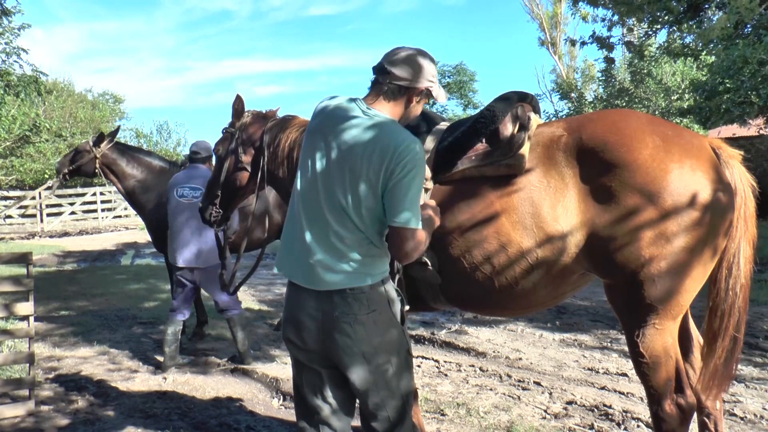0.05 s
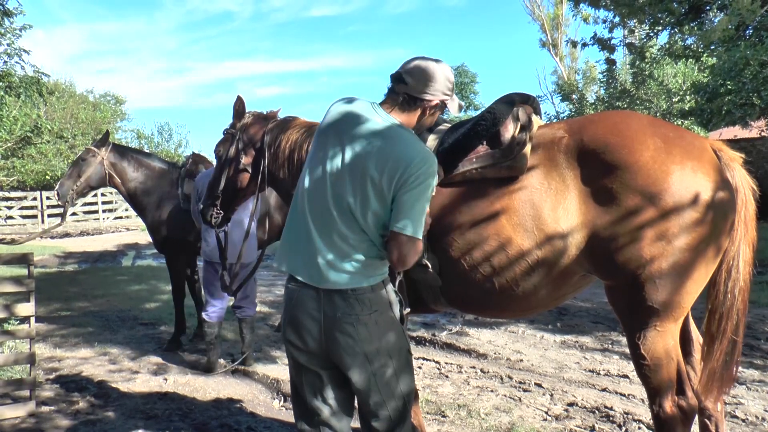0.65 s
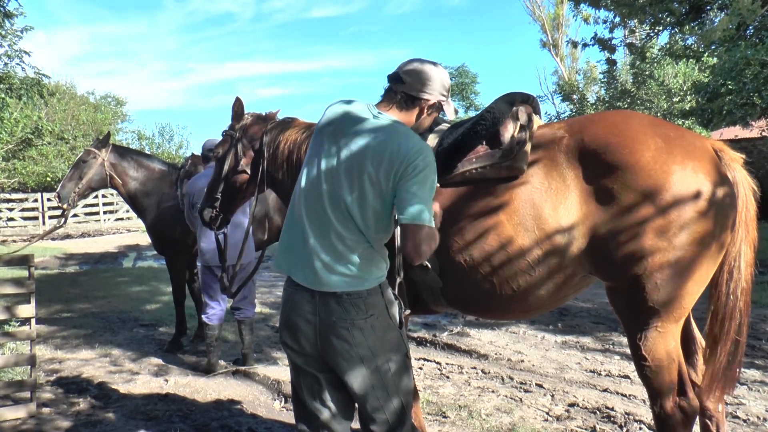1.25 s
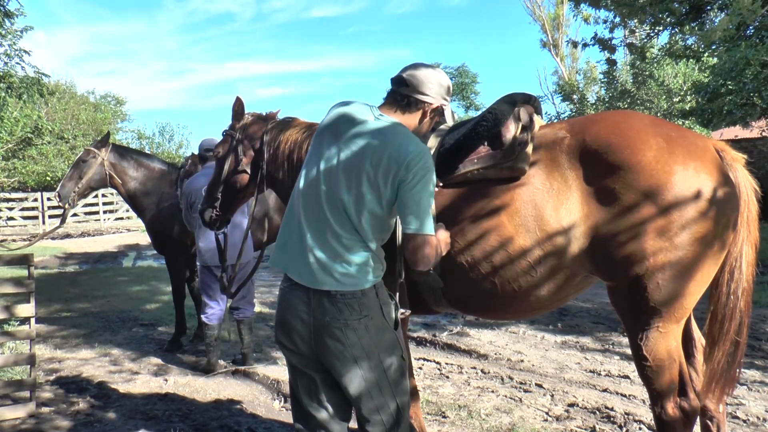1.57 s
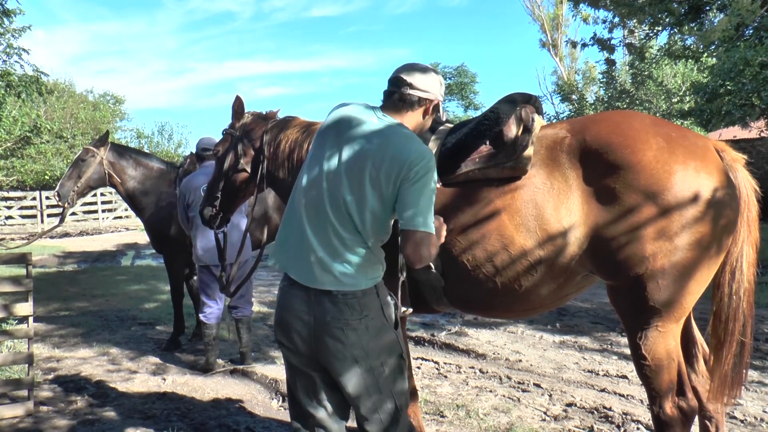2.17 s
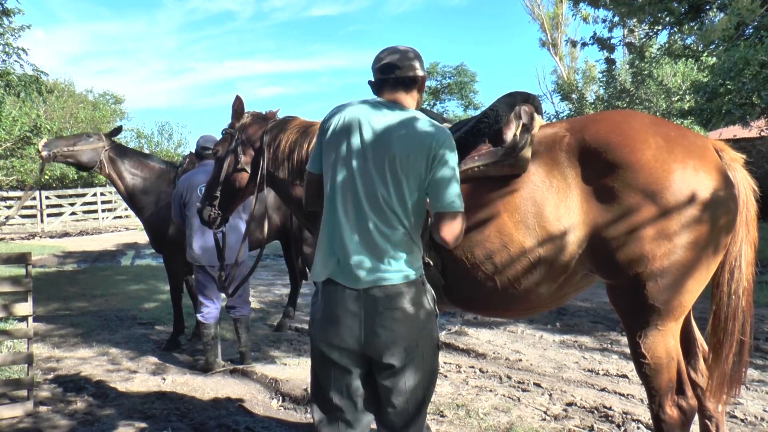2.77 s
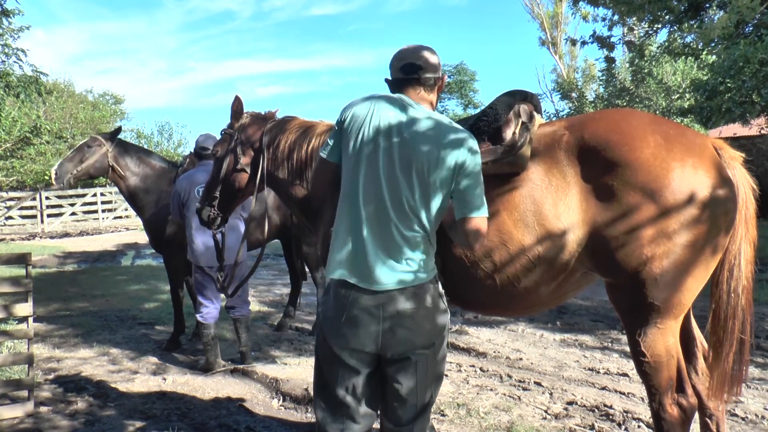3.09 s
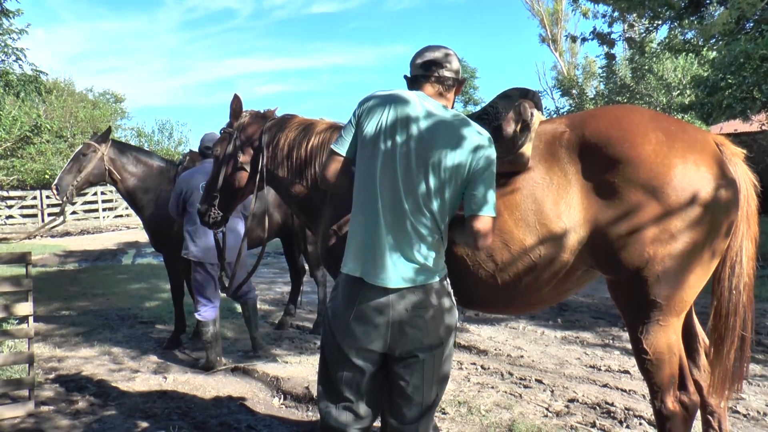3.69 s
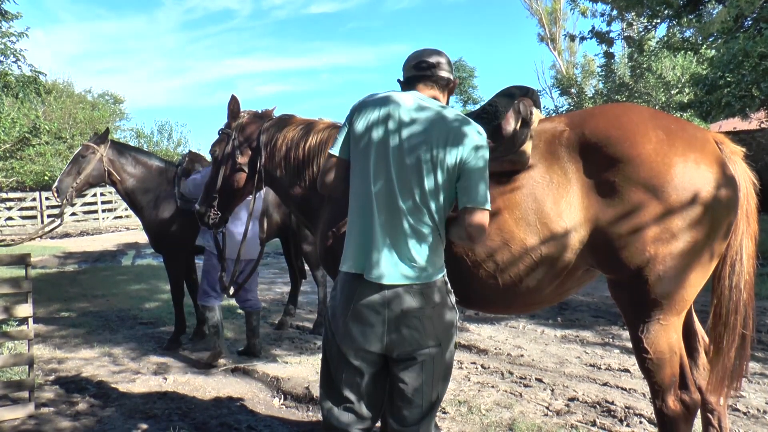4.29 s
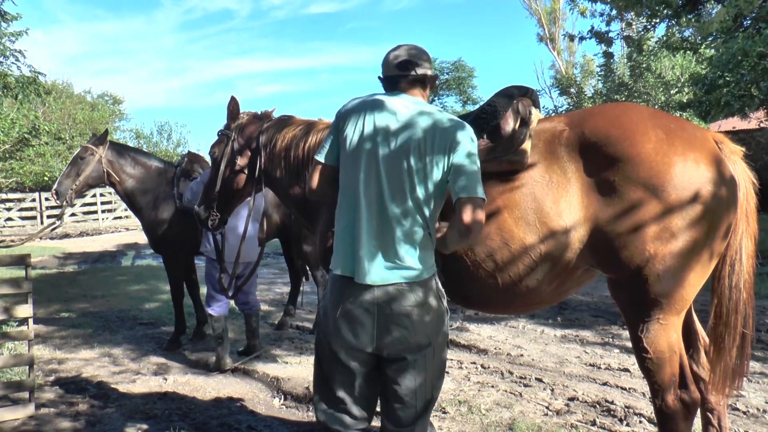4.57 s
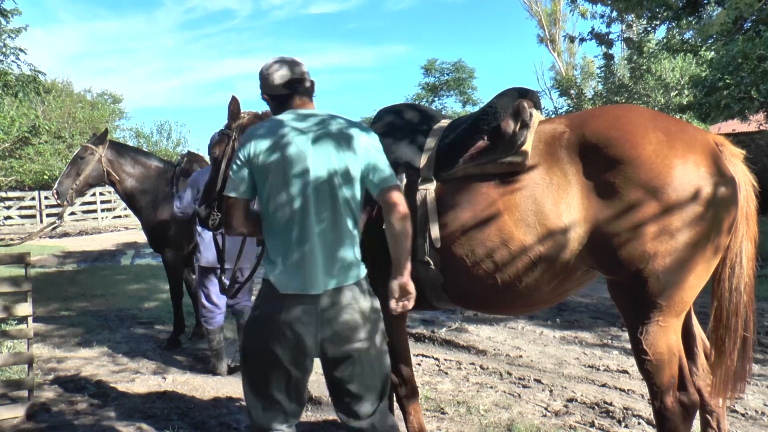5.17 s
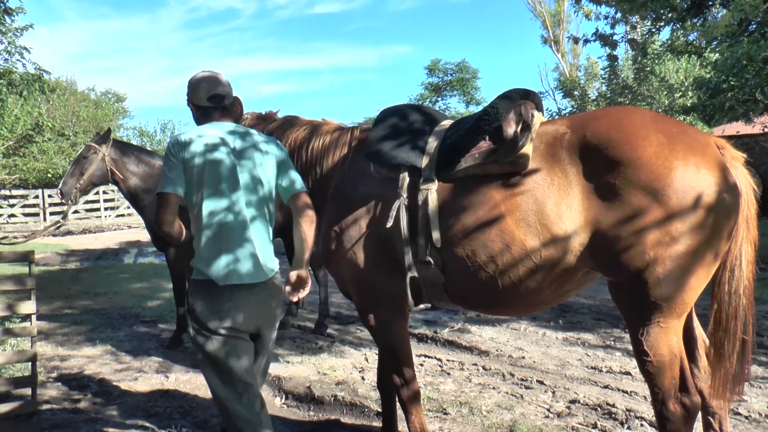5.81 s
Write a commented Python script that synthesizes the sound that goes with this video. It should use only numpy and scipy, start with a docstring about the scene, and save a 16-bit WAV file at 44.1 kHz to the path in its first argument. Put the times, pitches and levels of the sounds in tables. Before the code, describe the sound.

In an open corral, a songbird repeats a quick whistled phrase over high, pulsing crickets. Another bird trills, then gives falling buzzy calls. Saddle leather and buckles tick briefly, and boots and hooves softly scuff dry earth. The first bird returns as a throbbing insect swells, and rapid high chips close the scene. A light breeze rumbles on the microphone.

```python
"""Saddling up in a sunny corral.

Songbirds whistle and buzz over the wing strokes of crickets and a katydid; a throbbing insect joins late.
A man tightens a saddle (leather creaks, buckles tick); boots and hooves scuff dry, gritty ground.
A light breeze rocks the microphone; trees and fences return a faint echo."""
import sys
import numpy as np
from scipy import signal
from scipy.fft import rfft, irfft, next_fast_len
from scipy.io import wavfile
from scipy.ndimage import uniform_filter1d

SR = 44100
rng = np.random.default_rng(int(sys.argv[2]) if len(sys.argv) > 2 else 0)


def put_to_file(sound):
    """Save the sound as 16-bit audio at rate SR, in the file named by the first command-line argument."""
    columns = np.atleast_2d(sound).T  # one column per channel
    safe = np.clip(columns, -1, 1)
    whole_steps = np.round(safe * 32767)
    wavfile.write(sys.argv[1], SR, whole_steps.astype(np.int16))


N = 257544
TIME = np.arange(N) / SR


def amp(db):
    """Decibels to gain."""
    return 10 ** (np.asarray(db) / 20)


def unit(x):
    """Scale to rms 1."""
    return x / np.sqrt(np.mean(x ** 2) + 1e-20)


def tone(hz):
    """Sine along a pitch track."""
    return np.sin(2 * np.pi * np.cumsum(hz) / SR)


def curve(rows, t=TIME, column=1):
    """Table column, linearly interpolated in time."""
    rows = np.asarray(rows)
    return np.interp(t, rows[:, 0], rows[:, column])


def add(mix, at_s, sound):
    """Mix a sound in, dropping any overhang."""
    start = round(at_s * SR)
    sound = sound[max(-start, 0):]
    part = mix[max(start, 0):][:len(sound)]
    part += sound[:len(part)]


def noise(spectrum):
    """Shaped noise, rms 1."""
    hz, db = np.transpose(spectrum)
    size = next_fast_len(N)
    bins_hz = np.fft.rfftfreq(size, 1 / SR)
    gain = amp(np.interp(np.log(bins_hz + 1), np.log(hz + 1), db))
    return unit(irfft(rfft(rng.standard_normal(size)) * gain, size)[:N])


def wander(t, max_hz):
    """Smooth random drift, rms about 1."""
    rates_hz = max_hz * rng.uniform(.2, 1, 8)
    return np.sin(2 * np.pi * (np.outer(t, rates_hz) + rng.random(8))).sum(1) / 2


# Spectra of open air, far insects and birds, rumble, breeze (frequency [Hz], relative density [dB])
AIR_SPECTRUM = [(24, -40), (40, 2), (80, -1.5), (197, -6.5), (260, -8.5), (653, -12.5), (2330, -27),
                (2770, -32.5), (4460, -48.5), (5300, -28), (5860, -61.5), (7520, -33), (12700, -56),
                (14000, -36), (15500, -86)]
DRONE_SPECTRUM = [(1900, -18), (2400, 3.5), (2800, -4), (3500, 0.5), (4500, -3.5), (5300, 5), (6100, -4.5),
                  (7400, 4.5), (8600, -12.5), (12500, -21.5), (14300, -8), (15600, -4)]
RUMBLE_SPECTRUM = [(15, 9), (35, 2.5), (55, -1), (77, 2.5), (100, -13), (200, -34.5)]
BREEZE_SPECTRUM = [(1, 0.5), (4, 1), (9, -9), (13, -10.5), (18, -15.5), (25, -26), (35, -35), (50, -35),
                   (100, -61), (300, -100)]
# Air envelope (time [s], relative level [dB])
AIR_LEVELS = [(0.0, -46), (0.24, -49), (1.95, -48), (2.36, -50), (5.27, -52), (5.84, -51)]
# Breeze envelope (time [s], level [dB])
BREEZE_LEVELS = [(0, -23), (.5, -18), (1, -18), (1.6, -16), (2.35, -16), (2.6, -26.5), (3.8, -23),
                 (4.5, -30), (5.84, -28)]


def background(air_gain_db=3.2, drone_db=-54, rumble_db=-46):
    """Open air, a far drone of insects and birds, low rumble, breeze on the microphone."""
    air = noise(AIR_SPECTRUM) * amp(curve(AIR_LEVELS) + air_gain_db + .65 * wander(TIME, 14))
    drone = noise(DRONE_SPECTRUM) * amp(drone_db + 1.45 * wander(TIME, 25))
    rumble = noise(RUMBLE_SPECTRUM) * amp(rumble_db)
    breeze = noise(BREEZE_SPECTRUM) * amp(curve(BREEZE_LEVELS))
    return air + drone + rumble + breeze


def stridulate(runs, hz, rate_hz, stroke_s, sag, jitter=.037, late_chance=0, spread_db=1, rasp=.003):
    """Wing strokes: short tones that sag in pitch as the scraper slows."""
    out = np.zeros(N)
    t = np.arange(int(stroke_s * SR)) / SR
    window = np.sqrt(2) * signal.windows.tukey(len(t), .6)
    for start_s, end_s, db in runs:
        timing, force, detune, _ = rng.standard_normal((600, 4)).T
        late = rng.random(600) < late_chance
        gaps_s = (1 + jitter * timing + .5 * late) / rate_hz
        teeth = 4 * uniform_filter1d(rng.standard_normal((600, 1024)), 16, axis=1)[:, :len(t)]
        for k, at_s in enumerate(start_s + np.cumsum(gaps_s) - gaps_s[0]):
            if at_s > end_s - stroke_s / 2:
                break
            pitch_hz = hz * (1 + .0041 * detune[k] + sag * (.5 - t / stroke_s) + rasp * teeth[k])
            add(out, at_s, amp(db + spread_db * force[k]) * window * tone(pitch_hz))
    return out


# Stroke runs, one table per cricket (start [s], end [s], relative level [dB])
NEAR_RUNS = [(0, 2.635, 0), (2.752, 3.32, -1), (3.45, 4.61, 0), (4.62, 5.16, -2), (5.17, 5.685, 0),
             (5.78, 5.9, 0)]
RIVAL_RUNS = [(.37, .46, -2), (.5, .6, -3), (.73, .97, 0), (1.45, 1.55, -4), (1.88, 1.98, -2),
              (4.76, 5.0, -.5), (5.27, 5.4, -1)]
SLOW_RUNS = [(.612, .705, 0), (1.66, 1.81, 1), (2.1, 2.3, -6), (2.7, 2.87, -2), (3.86, 4.05, -2)]
THIN_RUNS = [(.3, 1.06, 0), (1.33, 1.56, 0), (1.88, 2.15, -2), (4.4, 5.1, -1), (5.35, 5.75, -1)]
# Faint, low cricket's run (start [s], end [s], level [dB])
LOW_RUNS = [(2.72, 3.3, -66)]


def crickets(near_db=-45.3, slow_db=-54, thin_db=-64):
    """Five crickets scrape their wings: two near at one pitch, one slower and higher, two far."""
    near = stridulate(NEAR_RUNS, hz=5285, rate_hz=79, stroke_s=.009, sag=.06,
                      jitter=.07, late_chance=.12)
    rival = stridulate(RIVAL_RUNS, hz=5270, rate_hz=76, stroke_s=.01, sag=.05, jitter=.15)
    slow = stridulate(SLOW_RUNS, hz=7820, rate_hz=43, stroke_s=.01335, sag=.12, rasp=.0052)
    thin = stridulate(THIN_RUNS, hz=10700, rate_hz=60, stroke_s=.006, sag=.071)
    low = stridulate(LOW_RUNS, hz=2820, rate_hz=120, stroke_s=.016, sag=.06, jitter=.2, rasp=.04)
    return amp(near_db) * (near + rival) + amp(slow_db) * slow + amp(thin_db) * thin + low


# Gaussian swells of far crickets (centre [s], half width [s], gain [dB])
CHORUS_SWELLS = [(.1, .1, 4), (.56, .08, 8), (1.13, .12, 7), (1.7, .16, 10.5), (2.08, .1, 7),
                 (2.49, .06, 5), (2.95, .18, 6), (3.52, .11, 10), (4.4, .6, 5)]


def cricket_chorus(rest_db=-63.5, rest_hz=7320, hz_per_db=26):
    """Far crickets merge into a throbbing tone; harder strokes are louder and higher."""
    out = np.zeros(N)
    swell_db = sum(db * np.exp(-((TIME - at_s) / width_s) ** 2) for at_s, width_s, db in CHORUS_SWELLS)
    for rate_hz, pitch_ratio, voice_db in [(43.7, 1.01, 11.5), (81.2, .995, 5), (58.4, .82, 4.5)]:
        stroke = np.cumsum(rate_hz * (1 + .054 * wander(TIME, 12))) / SR % 1
        bend = .065 * (.5 - stroke) + .012 * wander(TIME, 4) + .004 * wander(TIME, 400)
        hz = (rest_hz + hz_per_db * swell_db) * pitch_ratio * (1 + bend)
        out += amp(voice_db) * np.sin(np.pi * stroke) ** 2 * tone(hz)
    return amp(rest_db + swell_db) * unit(out)


# Switch from ticks to strokes in each phrase (time [s])
KATYDID_SWITCHES_S = [.25, 1.09, 1.99, 2.75, 3.56, 4.6, 5.58]


def katydid(tick_db=-53, stroke_db=-55, ticking_s=.43, stroking_s=.128):
    """Very high wing ticks swell, then give way to a few slower strokes."""
    tick_runs = [(s - ticking_s, s, 0) for s in KATYDID_SWITCHES_S]
    stroke_runs = [(s, s + stroking_s, 0) for s in KATYDID_SWITCHES_S]
    ticks = stridulate(tick_runs, hz=13940, rate_hz=76, stroke_s=.0039, sag=.032, jitter=.015, rasp=.008)
    strokes = stridulate(stroke_runs, hz=14000, rate_hz=37, stroke_s=.01201, sag=.052, rasp=.008)
    swell_db = curve([point for s in KATYDID_SWITCHES_S for point in ((s - ticking_s, -4), (s, 2))])
    return amp(tick_db + swell_db) * ticks + amp(stroke_db) * strokes


def whistle(contour, shake=False, hoarse=False, flutter_db=1.84, shake_db=3.2):
    """Near-pure bird tone; shaking swings pitch and level. Returns (start time, sound)."""
    start_s, end_s = contour[0][0], contour[-1][0]
    t = np.arange(start_s, max(end_s, start_s + .004), 1 / SR)
    waver = .022 * wander(t, 450) if hoarse else .006 * wander(t, 220)
    hz = curve(contour, t) * (1 + waver)
    db = curve(contour, t, column=2)
    if shake:
        depth, rate_hz = curve(contour, t, column=3), curve(contour, t, column=4)
        phase = 2 * np.pi * np.cumsum(rate_hz * (1 + .09 * wander(t, 70))) / SR
        swing = np.cos(phase) - .086 * np.cos(2 * phase)  # round crests, sharp dips
        hz *= 1 + depth * swing
        db += shake_db * np.sin(phase)
    db += flutter_db * wander(t, 200)
    edges = signal.windows.tukey(len(t), min(1, .0055 * SR / len(t)))
    return start_s, np.sqrt(2) * amp(db) * edges * tone(hz)


def note(shape, at_s, db, pitch_ratio=1, hoarse=False):
    """Whistle a note shape, shifted in time, level and pitch."""
    return whistle(np.array(shape) * [1, pitch_ratio, 1] + [at_s, 0, db], hoarse=hoarse)


# Motif notes (time from anchor [s], pitch at full effort [Hz], relative level [dB])
SWEEP = [(-.126, 6220, -14), (-.117, 5300, -5.5), (-.106, 4750, 1), (-.095, 4480, -10), (-.08, 4450, -8.5)]
HUM = [(-.095, 2900, -11), (-.075, 2790, -5.5), (-.05, 2770, -6), (-.035, 2770, -17)]
HOOK = [(-.046, 3930, -13.5), (-.037, 3170, -3.5), (-.028, 2960, 1.5), (-.02, 2840, -16)]
RISE = [(0, 2370, -17), (0.014, 2600, -4), (.024, 3070, -2), (0.031, 3620, -8), (.043, 3665, 1.5),
        (0.061, 3720, -4), (.084, 3740, -9.5)]
# Motif repeats (anchor [s], effort [dB], sweep level [dB])
MOTIFS = [(.073, -37, -42), (.325, -34.3, -37.7), (.582, -32.7, -37), (.834, -33.3, -38),
          (1.087, -37, -36.5), (3.58, -38.7, -44.3), (3.837, -36.3, -44.5), (4.092, -33.3, -38.5),
          (4.343, -33, -39.6), (4.598, -37.1, -39), (4.871, -41.5, -45)]


def motif_bird(full_effort_db=-31, pitch_per_db=.0043, hum_db=-39.8, full_hook_db=-35):
    """A bird repeats four notes, going flat as its effort drops."""
    out = np.zeros(N)
    for at_s, effort_db, sweep_db in MOTIFS:
        slack_db = effort_db - full_effort_db
        pitch_ratio = 1 + pitch_per_db * slack_db
        hook_db = full_hook_db + .55 * slack_db
        add(out, *note(SWEEP, at_s, sweep_db, pitch_ratio, hoarse=True))
        for shape, db in ((HUM, hum_db), (HOOK, hook_db), (RISE, effort_db)):
            detune = 1 + .006 * rng.standard_normal()
            add(out, *note(shape, at_s, db, pitch_ratio * detune))
    return out


def friction(events, spectrum, rise_s, grain_db):
    """Decaying bursts of tiny slips, coloured by the rubbed material."""
    envelope = np.zeros(N)
    for at_s, db, decay_s in events:
        t = np.arange(int(6 * decay_s * SR)) / SR
        add(envelope, at_s, amp(db) * (1 - np.exp(-t / rise_s)) * np.exp(-t / decay_s))
    roughness = unit(uniform_filter1d(rng.standard_normal(N), 60))
    grains = unit(amp(grain_db * roughness))
    return envelope * grains * noise(spectrum)


# Earth scuffs and grit crunches (time [s], level [dB], decay [s])
SCUFFS = [(0.0, -42, .03), (.045, -36.5, .025), (.134, -36, .012), (.193, -35, .0044), (.59, -42.5, .055),
          (1.385, -48, .16), (2.942, -51.5, .079), (3.816, -41, .014), (3.87, -47, .04), (4.019, -43, .017),
          (4.207, -43, .02), (4.604, -40, .036), (4.816, -39, .0029), (5.0, -44.5, .024),
          (5.071, -47, .021), (5.35, -46.5, .028), (5.419, -44, .0084)]
CRUNCHES = [(4.604, -46, .02), (4.999, -39, .026), (5.069, -41, .019)]
# Spectra of dry earth and grit (frequency [Hz], relative density [dB])
EARTH_SPECTRUM = [(100, -12), (350, -4), (800, 4.5), (1400, 0), (2200, -13.5), (5000, -31), (9000, -30),
                  (15000, -30)]
GRIT_SPECTRUM = [(600, -22), (1500, -4), (2800, 0.5), (4300, 2), (6000, -7), (10000, -18), (15000, -28)]


def footsteps():
    """Boots and hooves scuff dry earth; grit crushes under a boot."""
    scuffs = friction(SCUFFS, EARTH_SPECTRUM, rise_s=.0022, grain_db=4.5)
    crunches = friction(CRUNCHES, GRIT_SPECTRUM, rise_s=.004, grain_db=4.5)
    return scuffs + crunches


# Leather and buckle ticks (time [s], level [dB])
SADDLE_TICKS = [(.095, -37), (.124, -35.5), (.132, -36.5), (.169, -38.5), (.562, -44), (.609, -38.5),
                (2.816, -38), (2.834, -39), (2.859, -32.5), (2.874, -37.5), (2.935, -37), (2.9732, -30.5)]
# Leather and buckle spectrum (frequency [Hz], relative density [dB])
SADDLE_SPECTRUM = [(1500, -22), (4500, -15), (5600, -2), (6400, 0), (7600, -10), (10000, -14), (12000, -11),
                   (13800, -6), (15500, -9)]


def saddle(decay_s=.0045):
    """Leather and buckles slip in short ticks as the saddle is tightened."""
    ticks = [(at_s, db, decay_s) for at_s, db in SADDLE_TICKS]
    return friction(ticks, SADDLE_SPECTRUM, rise_s=.0006, grain_db=1.5)


# Parts of a trill syllable (time from anchor [s], pitch [Hz], relative level [dB])
SLUR = [(-.028, 4070, -18), (-.018, 3594, -2), (-.011, 3470, -4.5), (-.004, 3490, -35)]
UPSTROKE = [(0, 2670, -14.5), (0.014, 3210, -3.5), (0.018, 3950, -2), (.024, 5160, -18)]
DOWNSTROKE = [(.027, 5250, -17), (.032, 3880, -9), (.037, 3450, -2), (0.044, 3150, -13)]
# Trill syllables (anchor [s])
SYLLABLES_S = [.863, 1.004, 1.114, 1.224, 1.332, 1.438, 1.543, 1.656]
# Closing whistle (time [s], pitch [Hz], level [dB])
FLOURISH = [(1.795, 2650, -44), (1.803, 3600, -30), (1.823, 3990, -31.5), (1.829, 4770, -36),
            (1.834, 3560, -32.5), (1.857, 3170, -34), (1.878, 2620, -39.5), (1.905, 2280, -41),
            (1.922, 1910, -59)]


def trill_bird(top_db=-30.5, crescendo_db_per_s2=27):
    """A second bird's trill swells, levels off and ends in an arched whistle."""
    out = np.zeros(N)
    for at_s in SYLLABLES_S:
        db = top_db - crescendo_db_per_s2 * (SYLLABLES_S[-1] - at_s) ** 2
        for shape in (SLUR, UPSTROKE, DOWNSTROKE):
            add(out, *note(shape, at_s, db))
    add(out, *whistle(FLOURISH))
    return out


def glide(start_s, length_s, first_hz, last_hz, db, attack_s, fade_db, *shaking, ease=2.7, release_s=.008):
    """Call contour: swells on the first pitch, then settles on the last while fading."""
    t = np.linspace(0, length_s, 120)
    attack_s = np.clip(attack_s, .001, length_s / 2)
    release_s = min(release_s, length_s / 2)
    progress = np.clip((t - attack_s) / (length_s - attack_s), 0, 1)
    hz = first_hz + (last_hz - first_hz) * np.expm1(-ease * progress) / np.expm1(-ease)
    gate = np.clip(np.minimum(t / attack_s, (length_s - t) / release_s), .1, 1)
    level_db = db + fade_db * progress ** 1.45 + 20 * np.log10(gate)
    return np.column_stack([start_s + t, hz, level_db, *np.outer(shaking, np.ones(len(t)))])


# Plain calls (start [s], length [s], first pitch [Hz], last pitch [Hz], level [dB])
WHISTLES = [(1.745, .008, 4200, 6500, -48), (1.762, .036, 3030, 3250, -40), (1.07, .15, 1855, 1842, -57),
            (2.238, .024, 2580, 2520, -49), (2.25, .12, 1880, 1850, -55), (2.55, .06, 1420, 1385, -54),
            (2.665, .018, 2150, 2550, -53), (4.78, .016, 6200, 6020, -43)]
# Shaken calls (start [s], length [s], first pitch [Hz], last pitch [Hz], level [dB],
# attack [s], fade [dB], shake depth [fraction of pitch], shake rate [Hz])
BUZZES = [(1.982, .17, 4420, 4560, -37.2, .028, -1, .14, 196),
          (2.193, .035, 4100, 2420, -35, .009, -13, .12, 195),
          (2.26, .332, 4250, 2280, -31.7, .036, -22, .115, 205),
          (5.162, .04, 7550, 7200, -34, .02, -1, .04, 260)]


def bird_calls():
    """Birds near and far: gliding whistles, some shaken fast into buzzes."""
    out = np.zeros(N)
    for row in WHISTLES:
        add(out, *whistle(glide(*row, attack_s=.008, fade_db=-4)))
    for row in BUZZES:
        add(out, *whistle(glide(*row), shake=True, hoarse=True, flutter_db=1.6))
    return out


# Insect rasp envelope (time [s], level [dB], throb rate [Hz])
THROB = [(0, -83, 25), (3.3, -80, 25), (3.6, -60, 25), (4, -56, 24), (4.5, -54.5, 22), (5.1, -52.5, 21),
         (5.84, -51.5, 20)]
# Rasp spectrum (frequency [Hz], relative density [dB])
THROB_SPECTRUM = [(2200, -19), (3400, 3.5), (4600, -3), (6000, -1.5), (7000, -12), (8300, 7), (9000, -4),
                  (9900, -11.5), (10600, -12.5), (12000, -11), (15500, -35)]


def throbbing_insect(depth_db=5, chirp_db=-56, chirp_start_s=3.3, fade_in_s=.29):
    """A wide, pulsing rasp with a faint rising chirp between pulses."""
    cycles = np.cumsum(curve(THROB, column=2) * (1 + .025 * wander(TIME, 4.5))) / SR
    rasp = unit(noise(THROB_SPECTRUM) * amp(depth_db * np.cos(2 * np.pi * cycles)))
    chirp_hz = 6600 * (1 + .9 * (cycles % 1 - .5) + .0214 * wander(TIME, 20))
    chirp = np.sqrt(2) * np.sin(np.pi * cycles) ** 16 * tone(chirp_hz)
    fade_in = np.clip((TIME - chirp_start_s) / fade_in_s, 0, 1)
    return amp(curve(THROB)) * rasp + fade_in * amp(chirp_db + wander(TIME, 15)) * chirp


# One falling chip (time from anchor [s], pitch [Hz], relative level [dB])
CHIP = [(-.009, 8300, -7), (-.003, 8100, -3), (.001, 7300, 0), (.005, 6750, -2)]


def chipping_bird(start_s=5.235, period_s=.0589, pair_gap_s=.014, chip_db=-41.3, fade_db_per_s=3):
    """A small bird alternates paired and single chips, slowly fading, over thin pips."""
    pip_run = [(start_s - .04, TIME[-1], -53)]
    out = stridulate(pip_run, hz=8000, rate_hz=72, stroke_s=.005, sag=.08,
                     jitter=.15, spread_db=2.5, rasp=.02)
    for k, beat_s in enumerate(np.arange(start_s, TIME[-1], period_s)):
        db = chip_db - fade_db_per_s * (beat_s - start_s)
        pair = [(beat_s + side * pair_gap_s, db - 2.5) for side in (-.5, .5)]
        chips = [(beat_s, db)] if k % 2 else pair
        for at_s, level_db in chips:
            add(out, *note(CHIP, at_s, level_db + 1.2 * rng.standard_normal(), hoarse=True))
    return out


def corral(x, tail_db, t60_s, leaves_db, bounce_db=-15):
    """Direct sound, quick bounces off ground and trunks, thin scatter from fences and foliage."""
    t = np.arange(SR * 3 // 4) / SR
    taps = rng.standard_normal(len(t)) * (rng.random(len(t)) < 1500 / SR)
    taps *= amp(-60 * t / t60_s) * (1 - np.exp(-t / .0033))
    taps *= amp(tail_db) / np.linalg.norm(taps)
    # small leaves reflect short waves best
    taps += amp(leaves_db) * signal.lfilter(*signal.iirpeak(4600, 4, fs=SR), taps)
    bounces = (rng.uniform(.001, .012, 5) * SR).astype(int)
    taps[bounces] += amp(bounce_db) * rng.choice([-1, 1], len(bounces)) / np.sqrt(len(bounces))
    return x + signal.fftconvolve(x, taps)[:N]


def scene():
    """Birds, insects and saddling in the open corral, mono."""
    insects = crickets() + cricket_chorus() + katydid() + throbbing_insect()
    work = saddle() + footsteps()
    mix = corral(motif_bird(), tail_db=-13, t60_s=.42, leaves_db=-1.5)
    other_birds = trill_bird() + bird_calls() + chipping_bird()
    mix += corral(other_birds, tail_db=-16.5, t60_s=.32, leaves_db=-5)
    mix += corral(insects + work, tail_db=-17, t60_s=.2, leaves_db=-14, bounce_db=-44)
    return (mix + background())[None]


def record(dry):
    """Steep low-pass band limit."""
    cutoff_hz = 15750
    lowpass = signal.firwin(511, cutoff_hz, window=("kaiser", 9), fs=SR)
    return signal.oaconvolve(dry, lowpass[None], "same")


dry = scene()
out = record(dry)
put_to_file(out)
```